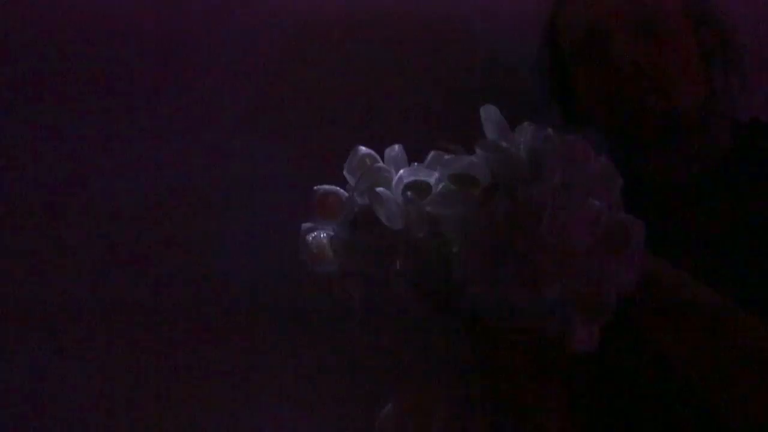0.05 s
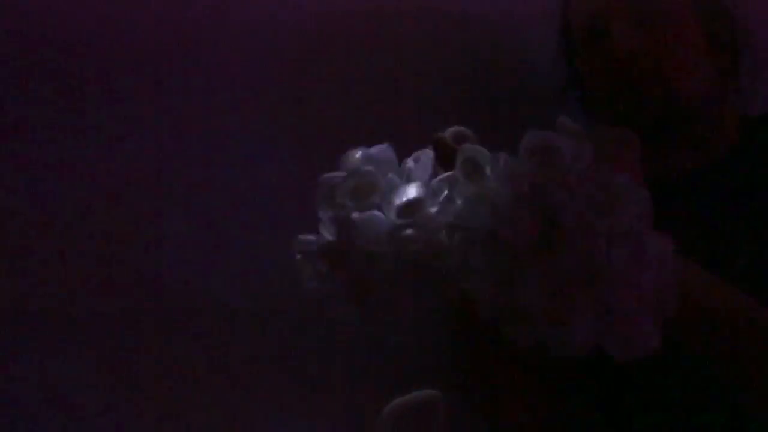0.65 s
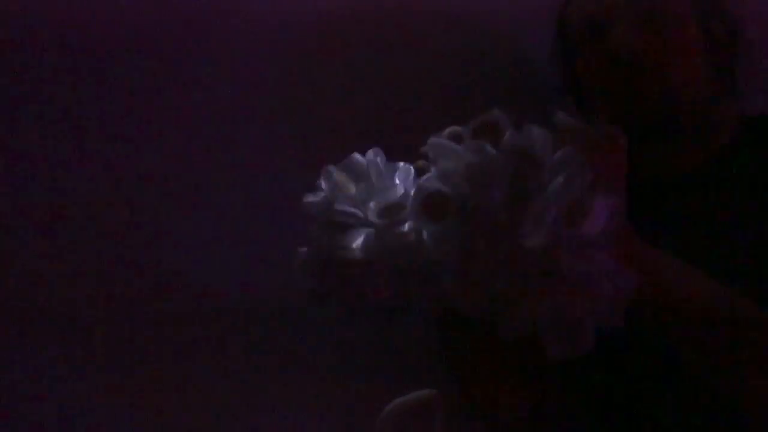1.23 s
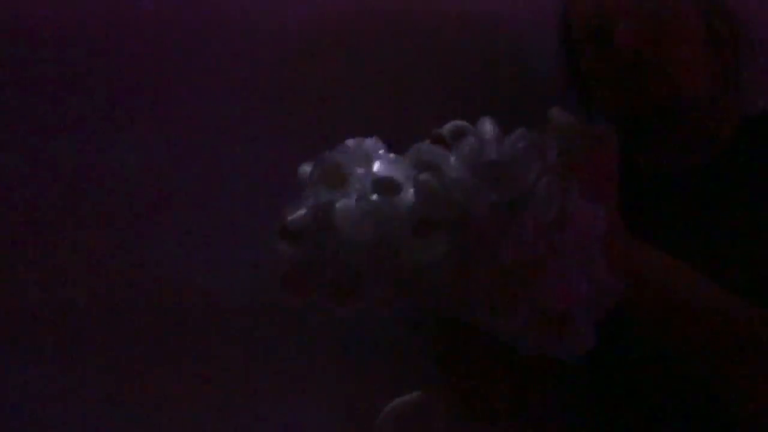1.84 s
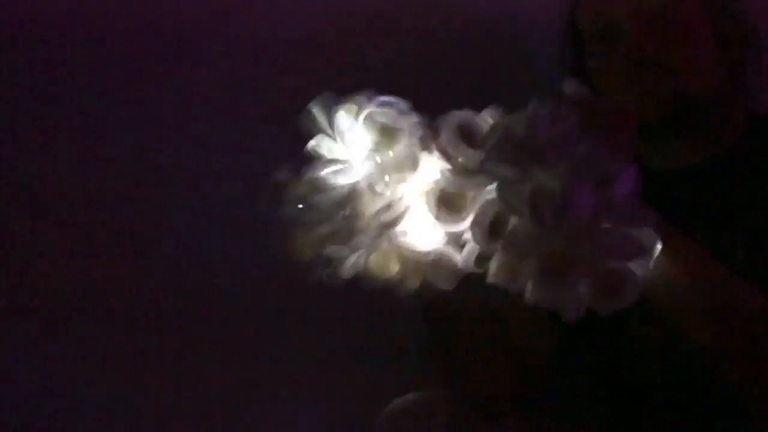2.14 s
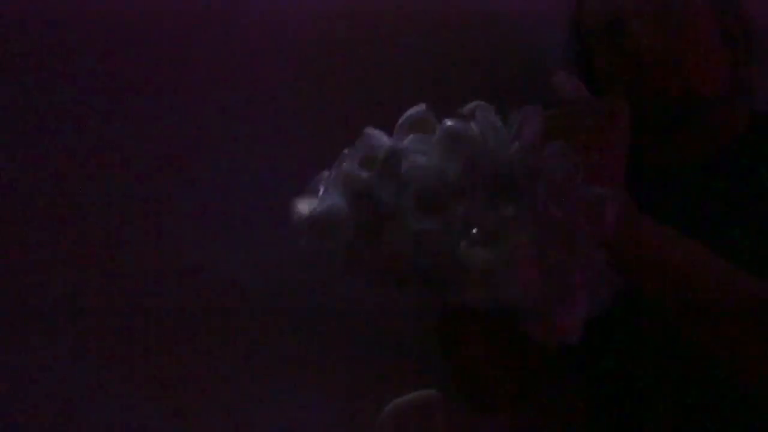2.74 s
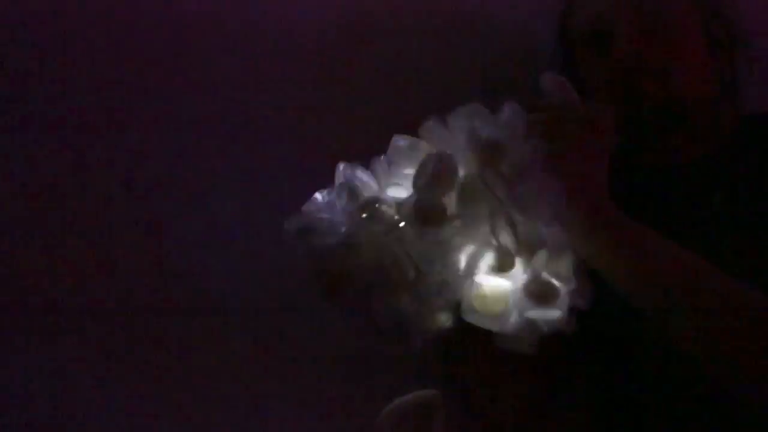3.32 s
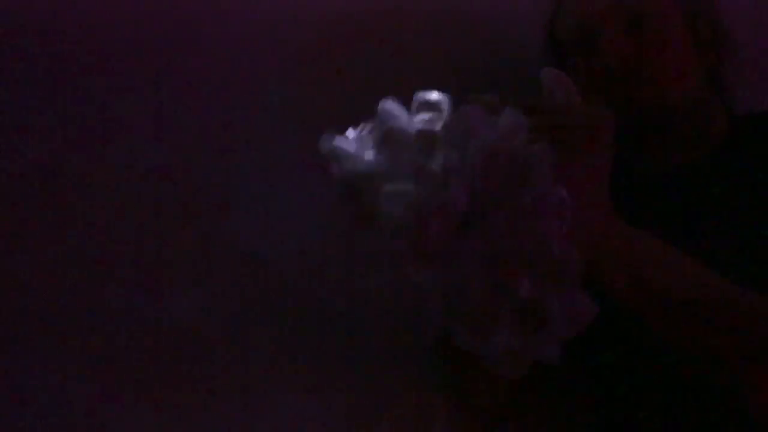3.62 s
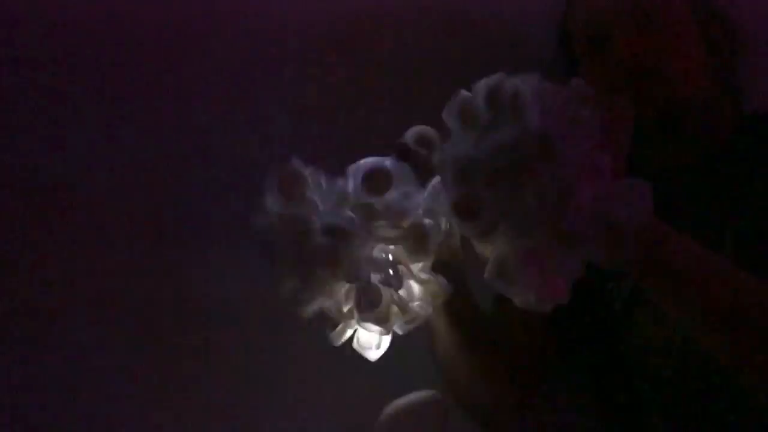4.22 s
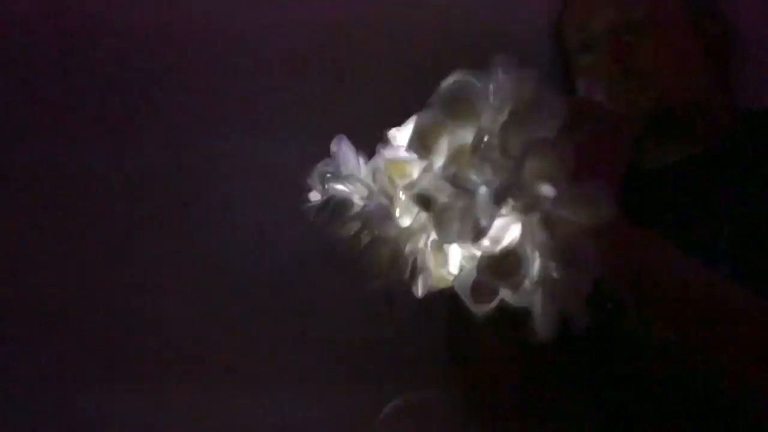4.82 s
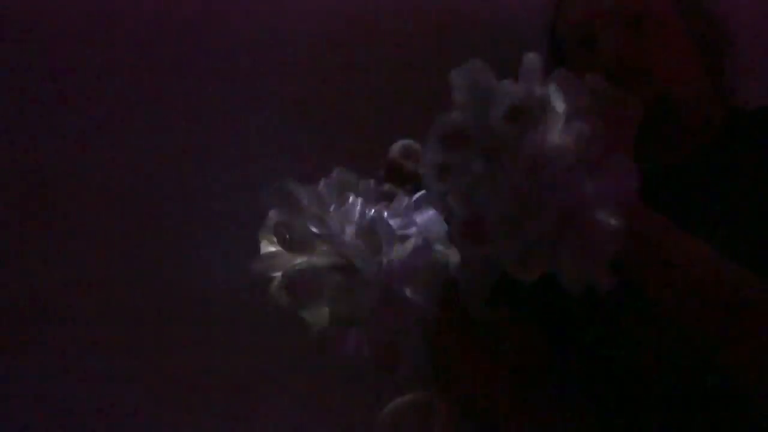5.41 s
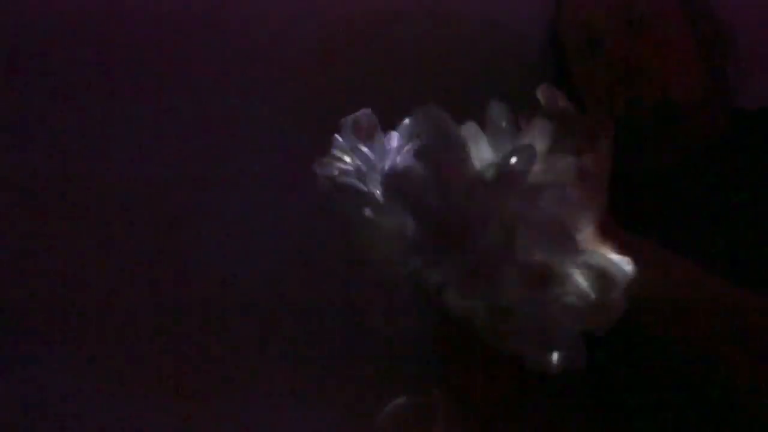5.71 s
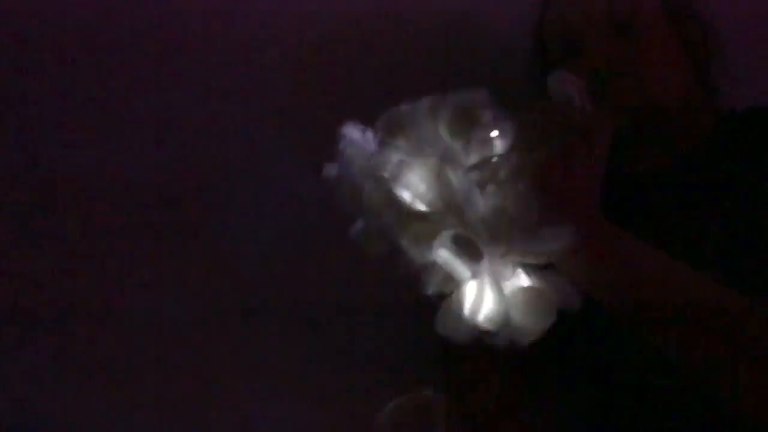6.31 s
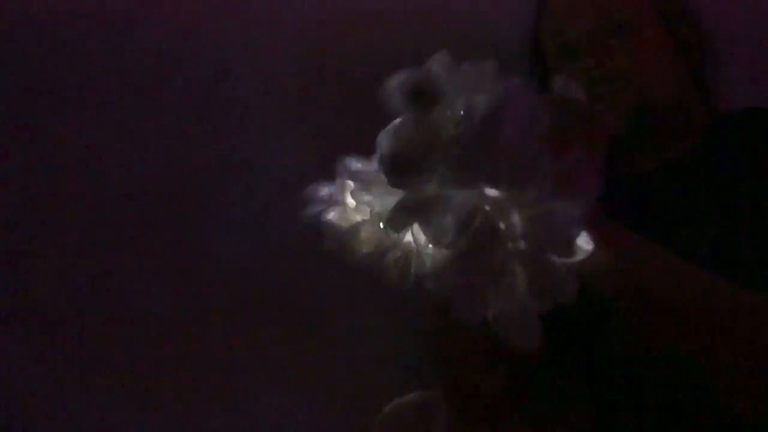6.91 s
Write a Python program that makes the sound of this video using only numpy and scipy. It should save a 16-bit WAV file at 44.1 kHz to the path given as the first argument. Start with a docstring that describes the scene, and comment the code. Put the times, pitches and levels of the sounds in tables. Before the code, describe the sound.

Hand-shaken seed pod rattle clattering with a hollow, woody ring: three quick single shakes followed by longer bursts with brief pauses.

```python
"""Seed pod rattle

A bunch of dry, hollow seed pods is shaken by hand in a small quiet room: three single flicks, then
longer shakes. The pods collide hundreds of times a second. Each collision rings the hollow of one pod
and clacks its hard shell; as the bunch settles, the contacts grow soft and little but the ring is left."""
import sys
import numpy as np
from scipy import signal
from scipy.fft import rfft, irfft
from scipy.io import wavfile
from scipy.ndimage import uniform_filter1d

SR = 44100
rng = np.random.default_rng(int(sys.argv[2]) if len(sys.argv) > 2 else 0)


def int16_out(signal):
    """Quantize to a 16-bit WAV file."""
    q = np.round(np.clip(np.atleast_2d(signal).T, -1, 1) * 32767)
    wavfile.write(sys.argv[1], SR, q.astype(np.int16))


N = 315315

# room tone spectrum: (frequency [Hz], relative level [dB])
ROOM_TONE_EQ = [(30, -52), (110, -11), (186, -12), (330, -19), (2300, -29), (15000, -37)]
# reverb decay of the room: (frequency [Hz], t60 [s])
ROOM_DECAY = [(200, 3), (2000, 1.21), (7000, 0.46), (15000, 0.71)]
# bass roll-off of the microphone: (frequency [Hz], gain [dB])
MIC_EQ = [(30, -30), (70, -16), (120, -19), (190, -4.5), (300, 0)]
# the dull thud of a collision: (frequency [Hz], relative level [dB])
THUD_EQ = [(60, -30), (120, -38), (200, -26.5), (380, -25), (600, -8.5), (800, -10.5), (1000, -3),
           (1350, 8.5), (2000, 9), (2900, 3.5), (4000, -11), (8000, -19.5)]
# the bright clack of a shell: (frequency [Hz], relative level [dB])
CLACK_EQ = [(300, -35.5), (1200, -4), (2500, 6), (3300, 4), (4000, -2), (5100, 0), (5700, -3), (6600, 0.5),
            (8000, -9.5), (10000, -9.5), (12500, -18), (16000, -29)]
# lone ticks between shakes: (time [s], peak level [dB], pitch [Hz])
SLIP_CUES = [(2.8639, -42, 11000), (3.6074, -57, 8800), (3.6721, -42, 9480), (5.1826, -42, 13000)]
# single hard collisions: (time [s], relative level [dB], pitch of the knock's brief ping [Hz])
KNOCK_CUES = [(0.2995, -78.5, 2800), (0.3536, -53, 2800), (0.4214, -23.5, 2710), (0.5255, -10.5, 2680),
              (0.6752, -13, 2520), (1.0526, -13, 2740), (1.6529, -13, 2720), (1.6664, -8.5, 2820),
              (1.849, -15, 2860), (2.3032, -5, 2900), (2.965, -19.5, 2580), (3.018, -5.5, 2680),
              (3.0949, -9, 6360), (3.3912, -13, 2800), (3.787, -11, 3160), (3.836, -9, 2600),
              (4.0294, -11, 2600), (4.173, -13, 2740), (4.1973, -9.5, 2920), (4.3713, -11.5, 3180),
              (4.54, -7.5, 3370), (4.7259, -10.5, 3470), (4.9104, -5, 2650), (5.3267, -8, 2660),
              (5.383, -6, 2800), (5.4413, -12, 2570), (5.5348, -12, 2510), (6.1771, -10.5, 2630),
              (6.9121, -8, 2840), (7.1037, -8, 2530)]
# single flicks of the wrist: (start [s], end of the swinging [s], starting level [dB])
FLICK_CUES = [(0.428, 0.865, -37), (0.997, 1.43, -35.5), (1.596, 2.078, -34.5)]
# spells of steady shaking: (start [s], stop [s], starting level [dB])
SHAKE_CUES = [(2.21, 2.695, -30), (2.969, 3.379, -30), (3.771, 4.977, -30), (5.284, 5.79, -31),
              (6.093, 6.587, -30), (6.887, 7.15, -30)]
# accents where the whole bunch swings against itself: (time [s], level [dB], time to ebb 10 dB [s])
CLASH_CUES = [(0.508, -27, .04), (0.664, -28.5, .038), (0.854, -39, .05), (1.078, -25.5, 0.0455),
              (1.247, -37, 0.02), (1.427, -40.5, .04), (1.664, -24.3, 0.0414), (1.866, -34.5, .04),
              (2.03, -34.5, .05), (2.262, -24.5, .028), (2.322, -26.5, 0.0464), (2.49, -31, 0.06),
              (3.03, -26, 0.0342), (3.094, -30, 0.0343), (3.222, -30, 0.04), (3.39, -31, 0.03),
              (3.79, -27, 0.03), (3.84, -27, 0.04), (4.03, -29, 0.03), (4.185, -29.5, 0.04),
              (4.372, -29.5, .02), (4.92, -32.5, .05), (5.338, -28.5, 0.04), (5.39, -32, 0.04),
              (5.539, -26, .018), (5.745, -31, 0.07), (6.916, -27.5, 0.0363), (7.125, -26, 0.05)]

ATTACK_DB_PER_S, SETTLE_DB_PER_S = 560, 108  # the pods come loose quickly and settle slowly


def gain_of(db):
    """Decibels to amplitude."""
    return 10 ** (np.asarray(db) / 20)


def unit_rms(x):
    """Scales to rms 1."""
    return x / np.sqrt(np.mean(x ** 2) + 1e-20)


def steadied(x, window=2200):
    """Rides the gain to rms 1 over every short stretch: the hand sets the energy the collisions share."""
    power = uniform_filter1d(uniform_filter1d(x ** 2, window), window)
    return x / np.sqrt(abs(power) + 1e-12)


def curve_at(points, hz):
    """Reads a table on a log-frequency axis."""
    point_hz, value = np.transpose(points)
    return np.interp(np.log(hz + 1), np.log(point_hz), value)


def add(mix, at_s, sound):
    """Drops a sound into the mix at the given time."""
    part = mix[round(at_s * SR):][:len(sound)]
    part += sound[:len(part)]


def equalise(x, points, size=4096):
    """Minimum-phase EQ, so that clicks keep their sharp fronts."""
    log_gain = np.log(gain_of(curve_at(points, abs(np.fft.fftfreq(size, 1 / SR)))))
    response = np.exp(np.conj(signal.hilbert(log_gain)))
    taps = np.fft.ifft(response).real[:size // 2]
    return signal.oaconvolve(x, taps)[:len(x)]


def room_tone(level_db=-79):
    """The faint, low hush of the room."""
    return gain_of(level_db) * unit_rms(equalise(rng.standard_normal(N), ROOM_TONE_EQ))


def room_path(x, early_db=-11, tail_db=-8, reflections=8):
    """One path round the room: early reflections off near surfaces, then a short diffuse tail."""
    early = np.zeros(SR // 2)
    polarity = rng.choice([-1, 1], reflections)
    early[rng.integers(SR // 500, SR // 60, reflections)] = polarity / np.sqrt(reflections)
    hz, t, noise = signal.stft(rng.standard_normal(SR // 2), SR, nperseg=256)
    decay = gain_of(-60 * t / curve_at(ROOM_DECAY, hz)[:, None])
    tail = signal.istft(noise * decay, SR)[1]
    tail = np.pad(tail, (SR // 200, 0))[:len(early)]  # 5 ms pre-delay
    impulse = gain_of(early_db) * early + gain_of(tail_db) * tail / np.linalg.norm(tail)
    return signal.fftconvolve(x, impulse)[:N]


def reverb(x, paths=8, turns_per_s=11):
    """Contacts happen all over the bunch, so the send crossfades from one room path to the next."""
    turn = turns_per_s * np.arange(N) / SR
    out = np.zeros(N)
    for k in range(paths):
        away = abs((turn - k / paths) % 1 - .5) * paths
        send = np.cos(np.pi / 2 * np.minimum(away, 1))
        out += room_path(x * send)
    return out


def cavity_ring(hz, t60=0.022, rise_s=0.00086):
    """The hollow note of one pod's cavity, which builds up quickly and dies away."""
    t = np.arange(2048) / SR
    return np.sin(2 * np.pi * hz * t) * (1 - np.exp(-t / rise_s)) * gain_of(-60 * t / t60)


def shell_burst(t60):
    """The crowded, quickly damped modes of a hard shell, as a burst of noise."""
    t = np.arange(1024) / SR
    return rng.standard_normal(len(t)) * gain_of(-60 * t / t60)


def rim_tick(hz, t60=0.012, relative_width=0.34):
    """The thin tick of two rims catching: a band-passed shell burst."""
    return signal.lfilter(*signal.iirpeak(hz, 1 / relative_width, SR), shell_burst(t60))


def slips():
    """A lone pod slips into place while the bunch is almost at rest."""
    out = np.zeros(N)
    for at_s, db, hz in SLIP_CUES:
        tick = rim_tick(hz)
        add(out, at_s, gain_of(db) * tick / abs(tick).max())
    return out


def scattered_ticks(per_s=70, size_db=2.5, low_hz=5000, high_hz=11000):
    """Rims catch at random through the clatter, each at its own pitch."""
    chance, size = rng.random(N), np.minimum(rng.exponential(1, N), 2.5)
    pitch = rng.uniform(low_hz, high_hz, N)
    out = np.zeros(N)
    for i in np.flatnonzero(chance < per_s / SR):
        add(out, i / SR, gain_of(size_db * size[i]) * unit_rms(rim_tick(pitch[i])))
    return unit_rms(out)


def knocks(trim_db=-6, crack_t60=0.018, ping_t60=.015, ping_gain=.2, ring_gain=0.99, cavity_hz=1790,
           bounce_s=0.0066, bounce_db=-6):
    """Two pods meet squarely and bounce once: each hit is a crack, a brief ping and a hollow ring."""
    out = np.zeros(N)
    variations = rng.uniform(-1.1, 1, (len(KNOCK_CUES), 3))
    for (start, db, ping_hz), (lag, *detunes) in zip(KNOCK_CUES, variations):
        for bounce, detune in enumerate(detunes):
            crack = equalise(shell_burst(crack_t60), CLACK_EQ)
            t = np.arange(len(crack)) / SR
            ping = np.sin(2 * np.pi * ping_hz * t) * gain_of(-60 * t / ping_t60)
            at_s = start + bounce * bounce_s * (1 + .5 * lag)
            blow = gain_of(db + trim_db + bounce * bounce_db)
            add(out, at_s, blow * (crack / abs(crack).max() + ping_gain * ping))
            add(out, at_s, blow * ring_gain * cavity_ring(cavity_hz * (1 + 0.052 * detune)))
    return out


def clash(t, peak_s, db, ebb_s):
    """Envelope in dB of the bunch swinging against itself: a swell and an ebb."""
    return db - 10 * abs(t - peak_s) / ebb_s


def tumble(t, start, stop, db, fall_db_per_s=0):
    """Envelope in dB of pods that come loose, keep tumbling while driven and then settle."""
    before, after = np.maximum(start - t, 0), np.maximum(t - stop, 0)
    held = np.clip(t - start, 0, stop - start)
    return db - ATTACK_DB_PER_S * before - fall_db_per_s * held - SETTLE_DB_PER_S * after


def agitation(t, grip_s=0.368, grip_db=-74, lift_s=0.08, lift_db=-47, surge_db=0.6, surge_s=0.02):
    """The rattle's envelope in dB: flicks, clashes and shakes add in power, with small chance surges."""
    moves = [tumble(t, *cue, fall_db_per_s=31) for cue in FLICK_CUES]  # the jostling dies down
    moves += [clash(t, *cue) for cue in CLASH_CUES]
    for start, stop, db in SHAKE_CUES:
        moves.append(tumble(t, start - lift_s, start, lift_db))  # lifting the bunch stirs the pods
        moves.append(tumble(t, start, stop, db, fall_db_per_s=0.73))  # the arm slowly tires
    first_flick = FLICK_CUES[0][0]
    shaken = 10 * np.log10(np.sum(gain_of(moves) ** 2, 0) + 1e-14)
    shaken -= ATTACK_DB_PER_S * np.maximum(first_flick - t, 0)  # fade in to the first flick
    grip = tumble(t, grip_s, first_flick, grip_db)  # the pods barely touch as the grip tightens
    surges = np.interp(t / surge_s, np.arange(len(t)), rng.standard_normal(len(t)))
    return np.maximum(shaken, grip) + surge_db * surges


def collisions(per_s=1500, pods=64, cavity_hz=1805, spread=.074, size_db=3.5, edge_db=1.0):
    """Random contacts, each on one pod with its own pitch; returns the rings and the clacks."""
    chance, pod = rng.random(N), rng.integers(0, pods, N)
    size, edge = np.clip(rng.standard_normal((2, N)), -2, 2)
    blows = rng.choice([-1, 1], N) * gain_of(size_db * size)
    rank = (np.arange(pods) + .5) / pods
    pitches = cavity_hz * np.exp(spread * np.log(rank / (1 - rank)) / 2)  # most pods are of middling size
    cavities = [cavity_ring(hz) for hz in pitches]
    spots = [shell_burst(t60=0.024) for _ in range(pods * 10)]  # each spot on a shell has its own sound
    spot = rng.integers(0, len(spots), N)
    rings, clacks = np.zeros((2, N))
    for i in np.flatnonzero(chance < per_s / SR):
        add(rings, i / SR, blows[i] * cavities[pod[i]])
        add(clacks, i / SR, blows[i] * gain_of(edge_db * edge[i]) * spots[spot[i]])  # edge-on clacks more
    return rings, clacks


def rattle(ring_db=-1.66, thud_db=-14.5, clack_db=-0.21, tick_db=-15,
           bright_from_db=-36, soft_hz=7400, dulling_db_per_db=1.2):
    """The shaken bunch, hollow body under shell clatter: harder shaking gives shorter, brighter contacts."""
    t = np.arange(N) / SR
    control_t = t[::64]
    drive_db = np.interp(t, control_t, agitation(control_t))
    body_db = -20.8 + 0.78 * (drive_db + 30)  # the body follows the clatter over a smaller range
    rings, clacks = collisions()
    thuds = equalise(clacks, THUD_EQ)
    body = gain_of(ring_db) * steadied(rings) + gain_of(thud_db) * steadied(thuds)
    hard = steadied(equalise(clacks, CLACK_EQ)) + gain_of(tick_db) * scattered_ticks()
    lowpass = 1 / (1 + (np.fft.rfftfreq(N, 1 / SR) / soft_hz) ** 6)
    soft = irfft(rfft(hard) * lowpass, N)  # slow contacts lack treble
    brightness = gain_of(-dulling_db_per_db * np.maximum(bright_from_db - drive_db, 0))
    clatter = soft + brightness * (hard - soft)
    return gain_of(body_db) * body + gain_of(drive_db + clack_db) * clatter


def scene():
    """The pods up close, their reverb and the room tone, in mono."""
    pods = rattle() + knocks() + slips()
    return (pods + reverb(pods) + room_tone())[None]


def record(dry):
    """A small microphone with little bass, then a steep high cut."""
    thin = equalise(dry[0], MIC_EQ)
    high_cut = signal.firwin(1023, cutoff=15820, window=("kaiser", 9), fs=SR)
    return signal.oaconvolve(thin, high_cut, "same")[None]


dry = scene()
out = record(dry)
int16_out(out)
```